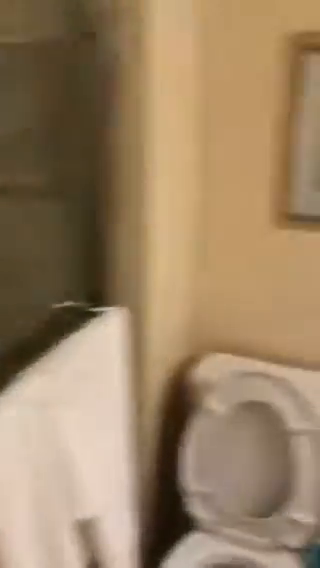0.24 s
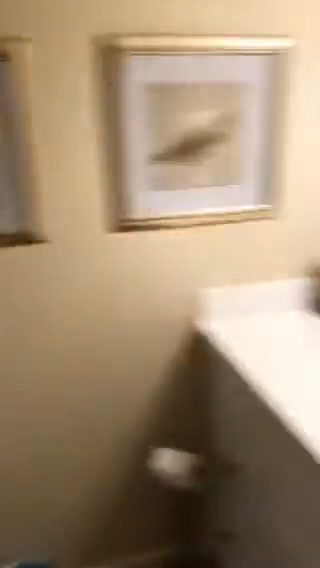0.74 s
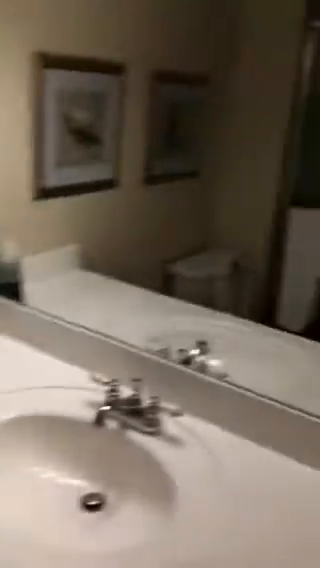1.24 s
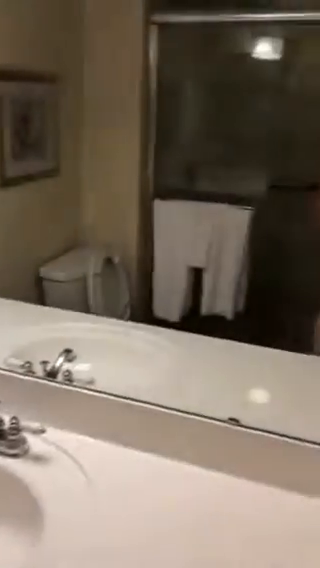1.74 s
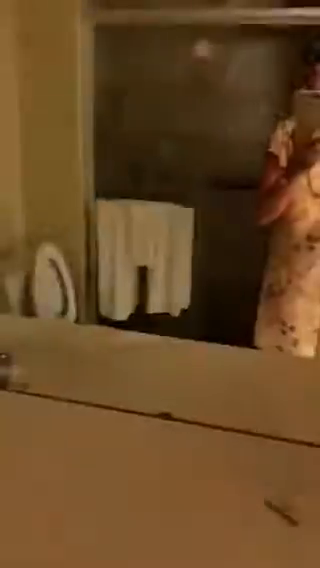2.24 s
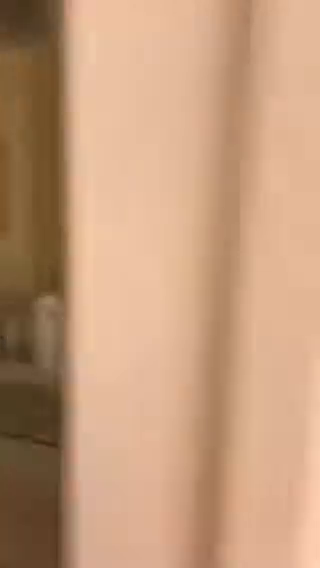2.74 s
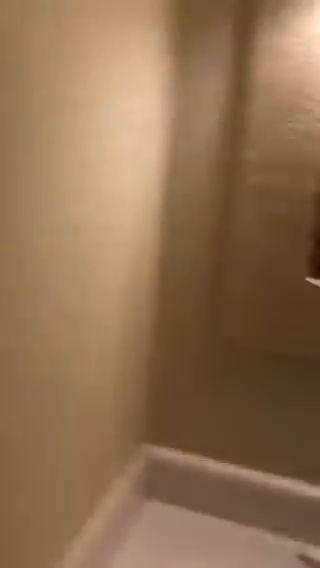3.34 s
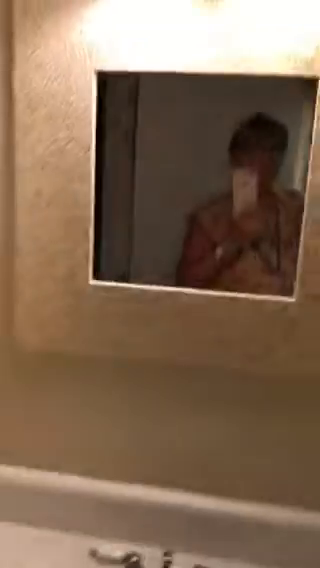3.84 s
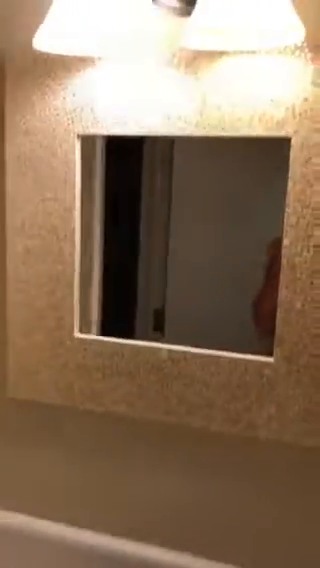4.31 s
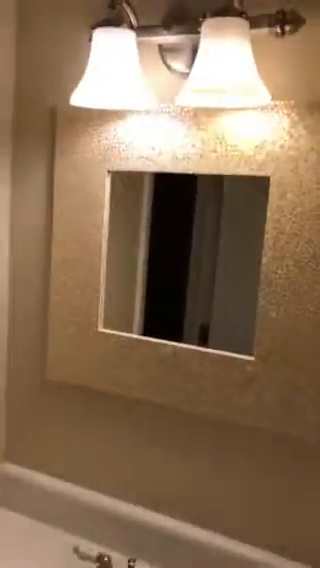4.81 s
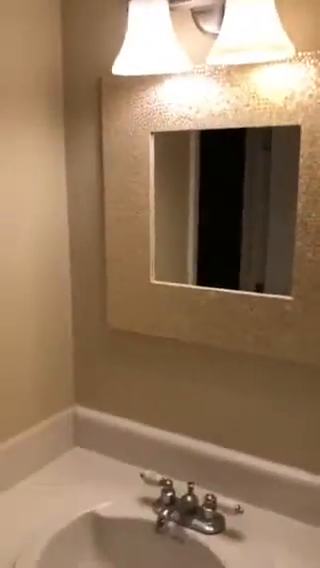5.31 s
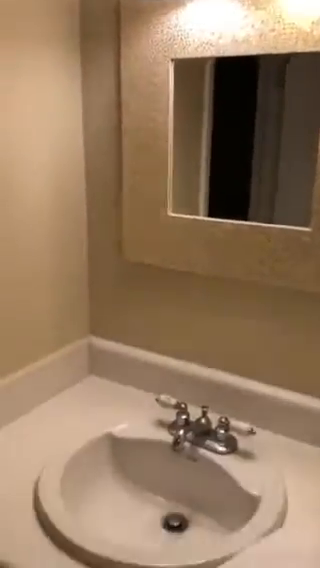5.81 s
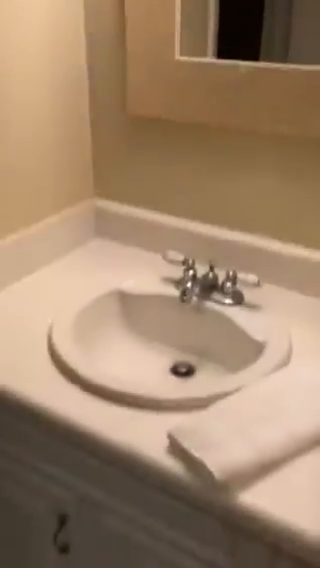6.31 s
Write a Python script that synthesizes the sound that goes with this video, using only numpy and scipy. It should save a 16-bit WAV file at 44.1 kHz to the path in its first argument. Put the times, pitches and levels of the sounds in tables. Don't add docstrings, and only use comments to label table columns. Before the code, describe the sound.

From 0 to 2.2 seconds a ceiling extractor fan rushes steadily in a small tiled bathroom: hollow, turbulent duct air with a mid-low wavering hum, strongest around 0.7 and gone by 1.4. A light sandal slap is nearly buried at 0.9. At 2.23 a wall switch snaps, sharp and dry, with a small thud. The fan coasts down, its tone sliding lower and fading by 2.9, while short high bearing squeaks chirp from 2.6 to about 3.2 amid soft brushing murmurs and scuffs. By 3.5 only quiet rumble and faint hiss remain. Sandals scuff gritty tile; dull knocks fall near 3.7 to 3.8, scrapes around 4.1, and a low slap at 4.6. The loudest bright slap comes at 4.88, then ticks and knocks around 5.2 to 5.3, fainter steps at 5.5 to 5.7, and a last soft thud at 6.1.

```python
import sys
import numpy as np
from scipy import signal
from scipy.fft import rfft, irfft, next_fast_len
from scipy.io import wavfile

SR = 44100
rng = np.random.default_rng(int(sys.argv[2]) if len(sys.argv) > 2 else 0)


def voltage_ratio(decibels):
    exponent = np.asarray(decibels, float) / 20
    return 10 ** exponent


def log_audio(samples):
    frames = np.atleast_2d(samples).T
    limited = np.clip(frames, -1, 1)
    pcm = np.round(limited * 32767).astype(np.int16)
    wavfile.write(sys.argv[1], SR, pcm)


N = 289138
TIME = np.arange(N) / SR

OFF_S = 2.233
COAST_S = 0.43
COAST_END_S = 2.9


def rms_one(x):
    return x / np.sqrt(np.mean(x ** 2) + 1e-20)


def in_time(rows):
    s, *columns = np.transpose(rows)
    from_start = TIME - s[0] + (s[0] < 0.01)
    gate = np.clip(np.minimum(from_start, s[-1] - TIME) / 0.02, 0, 1)
    return [np.interp(TIME, s, column) for column in columns] + [gate]


def at_hz(points, hz):
    table = np.array(points)
    return np.interp(np.log(hz), np.log(table[:, 0]), table[:, 1])


def coloured(spectrum, peaks=()):
    size = next_fast_len(N)
    hz = np.maximum(np.fft.rfftfreq(size, 1 / SR), 1)
    lift_db = sum(db / (1 + (2 * (hz - centre) / width) ** 2) for centre, width, db in peaks)
    gain = voltage_ratio(at_hz(spectrum, hz) + lift_db) * (hz > spectrum[0][0])
    return rms_one(irfft(rfft(rng.standard_normal(size)) * gain, size)[:N])


def drift(rate_hz):
    knots = rng.standard_normal(4000)
    return np.interp(TIME * rate_hz, np.arange(len(knots)), knots)


def moving_band(hz, width_hz, steady=0):
    low_pass = signal.butter(2, width_hz / 2, fs=SR, output="sos")
    slow = signal.sosfilt(low_pass, rng.standard_normal((2, N)))
    phase = 2 * np.pi * np.cumsum(hz) / SR
    in_phase = (rms_one(slow[0]) + steady) * np.cos(phase)
    return rms_one(in_phase + rms_one(slow[1]) * np.sin(phase))


def swell(s, rise, fall):
    late = TIME - s
    steps = np.maximum(-late / abs(rise), late / abs(fall))
    return voltage_ratio(-15 * np.minimum(steps, 8))


def room_tone():
    # (frequency [Hz], density [dB per Hz])
    quiet = [(15, -59), (25, -32), (45, -6.5), (82, -8), (113, -5), (148, -15.5), (173, -7.5), (209, -9.5),
             (331, -13.5), (631, -25.5), (848, -24), (970, -27.5), (15500, -47.5)]
    # (frequency [Hz], width [Hz], lift [dB])
    hum = [(62, 15, 7), (127, 6.3, 7), (188, 24, 2)]
    whine = coloured([(500, -34.5), (1200, -40.5)], [(830, 40, 30)])
    return voltage_ratio(-61.5 + 0.67 * drift(9.0)) * coloured(quiet, hum) + voltage_ratio(-84.5) * whine


def rotor_speed():
    return 1 / (1 + np.maximum(TIME - OFF_S, 0) / COAST_S)


def patchy(x, echo_db, t60, count):
    u, out = np.arange(SR // 4) / SR, 0
    spots_s = np.linspace(0, COAST_END_S, count)
    b, a = signal.butter(1, [760, 3500], "band", fs=SR)
    for k, white in enumerate(rng.standard_normal((count, len(u)))):
        echoes = signal.lfilter(b, a, white) * voltage_ratio(-60 * u / t60)
        answer = voltage_ratio(echo_db) * echoes / np.sqrt(np.sum(echoes ** 2)) + (u == 0)
        heard = signal.fftconvolve(x, answer / np.sqrt(np.sum(answer ** 2)))[:N]
        share = np.interp(TIME, spots_s, np.arange(count) == k)
        out = out + np.sqrt(share) * heard
    return out


def fan_rush():
    # (frequency [Hz], density [dB per Hz])
    roar_spectrum = [(24, -56.5), (40, -17.5), (85, -10), (101, -18), (129, -7), (168, -15), (251, -6.5),
                     (353, -10.5), (424, -7.5), (458, -5), (706, -13.5), (863, -15.5), (1230, -15.5),
                     (1600, -21), (2080, -51.5), (3520, -120)]
    # (frequency [Hz], density [dB per Hz])
    hiss_spectrum = [(410, -28.5), (700, -2), (861, -8), (1010, -1), (1240, -6), (1900, -11.5),
                     (2160, -6.5), (3450, -14.5), (5220, -22.5), (9720, -31), (15500, -40)]
    # (frequency [Hz], width [Hz], level above the rush [dB])
    duct = [(136.3, 20, 7), (247, 8.7, 3.5), (518.4, 7.4, 6), (600, 5.7, 7.5), (712.3, 7.8, 8.5),
            (910, 7.9, 5), (1040, 25, 2), (1260, 36, 3), (2200, 93, 0.5)]
    # (time [s], level [dB])
    nearness = [(0.0, -0.5), (.54, -.5), (.7, 0), (1.5, -1), (1.77, -1), (2.22, -1), (3.0, -0.5),
                (3.27, -8), (3.5, -19)]
    near_db, gate = in_time(nearness)
    speed = rotor_speed()
    roar_gain = voltage_ratio(-43 + near_db + 0.27 * drift(12.0)) * speed ** 2.07
    hiss_gain = voltage_ratio(-46.5 + near_db + 0.5 * drift(25.0)) * speed ** 2.3
    rush = roar_gain * coloured(roar_spectrum, duct) + hiss_gain * coloured(hiss_spectrum, duct)
    return gate * patchy(rush, echo_db=-9.0, t60=0.15, count=6)


def blade_tone():
    # (time [s], level [dB])
    tone_level = [(0.0, -48), (0.156, -46), (0.662, -40.5), (1.0, -45), (1.17, -44), (1.25, -50),
                  (1.45, -62)]
    db, gate = in_time(tone_level)
    phase = 2 * np.pi * np.cumsum(426.4 + 1.9 * drift(32.8)) / SR
    return np.sqrt(2) * gate * voltage_ratio(db + 3.3 * drift(25.2)) * np.sin(phase)


def basin_waves():
    # (time [s], centre [Hz], level [dB])
    waves = [(0., 520, -53), (1.0, 540.1, -50), (1.3, 484.7, -52), (1.7, 500, -62), (2.25, 478, -60)]
    hz, db, facing = in_time(waves)
    return facing * voltage_ratio(db) * moving_band(hz, width_hz=130.0)


def coasting_tone():
    speed = rotor_speed()
    hz = 479 * speed
    housing_db = 7 / (1 + (2 * (hz - 250) / 50) ** 2)
    free = np.clip(np.minimum((TIME - OFF_S) / 0.0075, (COAST_END_S - TIME) / 0.3), 0, 1)
    level = free * voltage_ratio(-43 + housing_db) * speed ** 1.6
    return level * moving_band(hz, width_hz=32.0, steady=2.2)


def housing_brush():
    # (time [s], centre [Hz], level [dB])
    brushes = [
        (2.708, 684, -57.5),
        (2.868, 850, -65.5),
        (2.98, 777, -62),
        (3.084, 851, -62),
        (3.162, 769, -57.5),
    ]
    out = np.zeros(N)
    for s, hz, db in brushes:
        out += voltage_ratio(db) * swell(s, rise=0.07, fall=0.06) * moving_band(np.full(N, hz), width_hz=31.0)
    return out


def sandal_contacts():
    # (time [s], peak [dB], centre [Hz], half-width [octaves])
    slaps = [
        (.876, -41.5, 10940, 2),
        (3.205, -54.5, 6000, 1.7),
        (3.963, -72, 6030, 0.84),
        (4.329, -55, 4000, 1.2),
        (4.584, -48, 2470, 1.4),
        (4.879, -31, 7160, 0.82),
        (5.31, -51, 3180, 0.63),
        (5.530, -56.5, 2200, .87),
        (5.713, -61, 13480, 0.35),
    ]
    # (time [s], peak [dB], centre [Hz], half-width [octaves])
    ticks = [
        (4.779, -44, 2000, 2.3),
        (4.780, -43, 497, 1.04),
        (5.189, -52, 2667, 1.5),
        (5.303, -39, 3000, 0.94),
    ]
    # (time [s], peak [dB], centre [Hz], half-width [octaves])
    knocks = [(3.084, -54.5, 128, 0.31), (3.687, -46.5, 683, 1.15), (3.785, -38.5, 566, 1.2),
              (3.789, -58, 197, 0.87), (4.586, -50.5, 804, 0.37), (4.59, -54, 428, 0.29),
              (4.628, -47.5, 1674, .13), (4.843, -44, 870, 1.3), (4.842, -47, 1636, 0.092),
              (4.882, -38.5, 1340, 1.46), (5.193, -48.5, 300, 0.793), (5.250, -69, 2405, .079),
              (5.309, -41.5, 1260, 0.52), (5.311, -41.5, 774, 0.32), (5.532, -54.5, 1213, 0.7),
              (6.09, -57.5, 400, 0.8)]
    return ([(*row, 0.069, 0.5) for row in slaps]
            + [(*row, 0.013, -10) for row in ticks]
            + [(*row, 0.07, -2) for row in knocks])


def switch_contacts():
    # (delay [s], peak [dB], centre [Hz], half-width [octaves], t60 [s])
    parts = [
        (0., -5, 7000, 0.58, 0.0092),
        (0., -10.5, 13500, .5, 0.013),
        (0.00062, -8, 3300, .6, 0.009),
        (0.0033, -14.5, 1100, 0.87, .025),
        (0.011, -23.5, 480, .5, 0.029),
        (0, -39.5, 1050, 0.027, .25),
        (0.0082, -33.5, 4850, .04, .1),
        (.003, -33, 7450, .04, .08),
        (.003, -32, 3550, 0.065, .08),
    ]
    return [(OFF_S + delay, *part, -1) for delay, *part in parts]


def hits(rows):
    direct, sent = np.zeros(N + SR), np.zeros(N + SR)
    t = np.arange(SR // 5) / SR
    for s, db, hz, octaves, t60, room_db in rows:
        edges = np.clip([hz / 2 ** octaves, hz * 2 ** octaves], 30, 0.45 * SR)
        band = signal.butter(3, edges, "band", fs=SR, output="sos")
        rise = np.minimum(t / (0.025 * t60), 1)
        burst = signal.sosfilt(band, rng.standard_normal(len(t)) * rise * voltage_ratio(-60 * t / t60))
        burst = voltage_ratio(db) * burst / np.abs(burst).max()
        click = rms_one(signal.sosfilt(band, 1.0 * (t == 0))) * np.sqrt(np.mean(burst ** 2))
        at = round(s * SR)
        direct[at:at + len(t)] += burst
        sent[at:at + len(t)] += voltage_ratio(room_db) * click
    return direct[:N], sent[:N]


def slides():
    # (frequency [Hz], density [dB per Hz])
    bright_spectrum = [(1470, -43), (2500, -13), (3170, -2), (3890, 0), (5490, 1.5), (5750, -1), (8680, -4),
                       (15500, -8)]
    # (frequency [Hz], density [dB per Hz])
    dull_spectrum = [(240, -45), (400, 2), (727, 1), (1540, 4), (1680, 5), (3080, 0.5), (4000, -8),
                     (5200, -30), (8800, -120)]
    # (time of most pressure [s], rise [s], fall [s], bright level [dB], dull level [dB])
    scuffs = [(2.39, .02, 0.13, -58.5, -52), (2.64, 0.05, 0.24, -69.5, -67), (2.85, 0.036, 0.2, -67.5, -60),
              (3.095, 0.15, 0.15, -61.5, -61), (3.228, 0.024, 0.066, -64.5, -68),
              (3.3, .05, 0.36, -74.5, -73), (3.476, .02, .12, -72.5, -73.5),
              (3.615, 0.026, 0.24, -63.5, -67.5), (3.746, .12, 0.078, -57.5, -58.5),
              (3.966, 0.0073, 0.071, -67.5, -92), (4.05, 0.032, 0.158, -58.5, -65.5),
              (4.125, .12, 0.11, -59.5, -59.5), (4.33, 0.012, 0.044, -71, -71.5),
              (4.599, 0.011, 0.088, -67.5, -58.5), (4.647, 0.07, 0.054, -64, -70.5),
              (4.79, .07, 0.089, -63, -67.5), (4.83, 0.13, 0.19, -67.5, -73),
              (4.92, 0.069, 0.13, -59.5, -60), (5.195, .01, 0.045, -75, -59),
              (5.258, 0.053, 0.058, -54.5, -58.5), (5.31, 0.027, .1, -67.5, -59),
              (5.534, .02, 0.057, -90, -70)]
    bright_power, dull_power = np.zeros(N), np.zeros(N)
    for s, rise, fall, bright_db, dull_db in scuffs:
        pressure = swell(s, rise, fall)
        bright_power += (pressure * voltage_ratio(bright_db)) ** 2
        dull_power += (pressure * voltage_ratio(dull_db)) ** 2
    bright = np.sqrt(bright_power) * coloured(bright_spectrum)
    dull = np.sqrt(dull_power) * coloured(dull_spectrum)
    return voltage_ratio(2.0 + 1.03 * drift(150.0)) * (bright + dull)


def bearing():
    # (time [s], peak [dB], pitch [Hz], length [s], overtone level [dB])
    squeaks = [(2.606, -45, 2820, 0.021, -17), (2.61, -41, 2648, 0.026, -8.5), (2.639, -54, 2610, 0.01, 4),
               (2.662, -43, 2677, 0.016, -16), (2.682, -49, 2663, 0.022, -13),
               (2.763, -43.5, 2747, 0.012, -23.5), (2.805, -53, 2870, 0.033, -21),
               (2.835, -44, 2522, 0.025, -7), (2.851, -41, 2720, 0.0082, -28),
               (2.893, -45.5, 2522, 0.021, -10), (2.930, -50.5, 2540, 0.02, -13),
               (2.96, -61, 2410, 0.019, -3), (3.05, -59, 2610, 0.013, -14), (3.16, -59, 2660, 0.036, -23.5),
               (3.21, -67, 2750, 0.059, -23)]
    out, rough = np.zeros(N), drift(300.0)
    for s, db, hz, length, over_db in squeaks:
        span = slice(round(s * SR), round((s + length) * SR))
        u = TIME[span] - s
        pitch = hz * (1 + 0.015 * rough[span] - 0.003 * u / length)
        phase = 2 * np.pi * np.cumsum(pitch) / SR
        stack = np.sin(phase)
        for k in range(4):
            stack += voltage_ratio(over_db - 13 * k) * np.sin((k + 2) * phase)
        stack += voltage_ratio(over_db - 19.5) * (np.sin(2.5 * phase) + np.sin(3.5 * phase))
        out[span] += voltage_ratio(db) * np.sin(np.pi * np.clip(u / length, 0, 1)) ** 0.18 * stack
    return out


def room(x):
    # (frequency [Hz], t60 [s])
    tiles = [(125, 0.94), (500, 0.35), (1500, 0.31), (4000, 0.38), (8000, 0.31), (14000, .2)]
    t, tail = np.arange(SR) / SR, 0
    for hz in 90 * 2.0 ** np.arange(8):
        edges = [hz / 2 ** 0.5, min(hz * 2 ** 0.5, 0.45 * SR)]
        band = signal.butter(2, edges, "band", fs=SR, output="sos")
        fall_db = -60 * t / at_hz(tiles, hz)
        decay = voltage_ratio(fall_db) + voltage_ratio(-20 + fall_db / 2.1)
        tail = tail + signal.sosfilt(band, rng.standard_normal(SR)) * decay
    tail = tail * np.clip((t - 0.002) / 0.0058, 0, 1)
    return signal.fftconvolve(x, tail / np.sqrt(np.sum(tail ** 2)))[:N]


def scene():
    fan = fan_rush() + blade_tone() + basin_waves() + coasting_tone() + housing_brush()
    direct, sent = hits(sandal_contacts() + switch_contacts())
    scrape, squeak = slides(), bearing()
    wet = room(sent + voltage_ratio(-6.5) * squeak + voltage_ratio(-8.5) * scrape)
    return (room_tone() + fan + direct + scrape + squeak + wet)[None]


def band_limit(x):
    return signal.sosfilt(signal.butter(12, 15840, fs=SR, output="sos"), x)


def record(dry):
    bass_cut = signal.butter(2, 42.0, "high", fs=SR, output="sos")
    top_cut = signal.cheby2(10, 60, 17200, fs=SR, output="sos")
    mix = signal.sosfilt(top_cut, signal.sosfilt(bass_cut, dry))
    return band_limit(mix)


dry = scene()
out = record(dry)
log_audio(out)
```